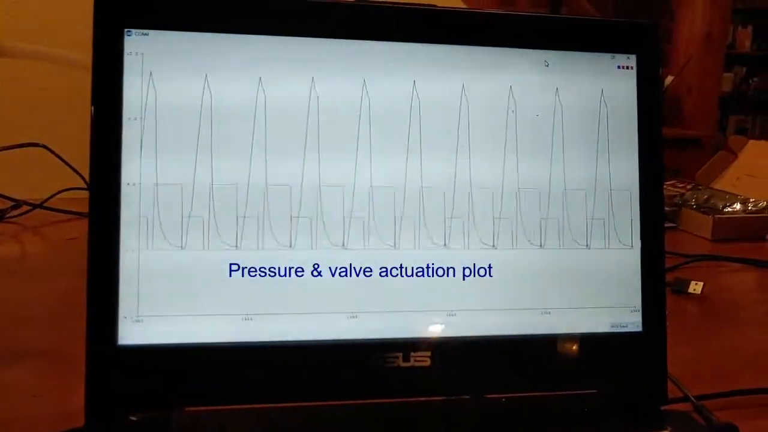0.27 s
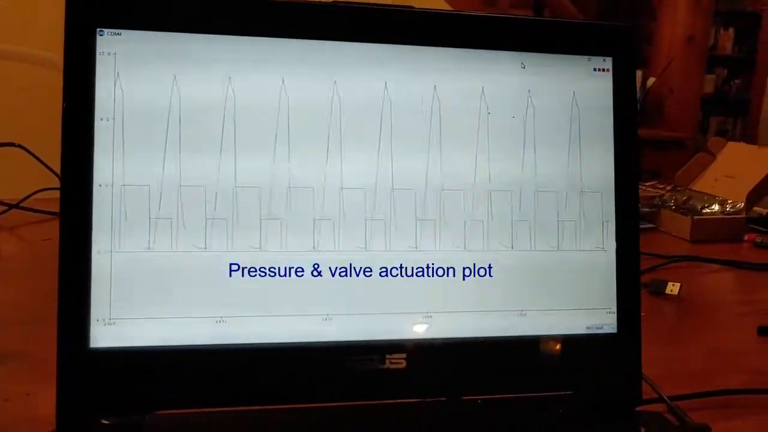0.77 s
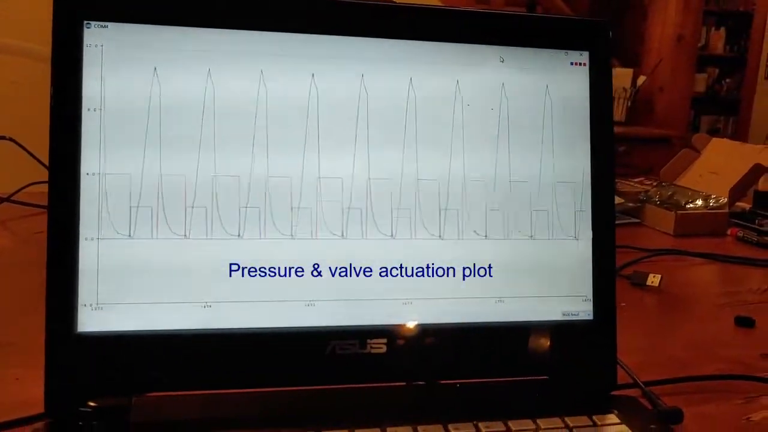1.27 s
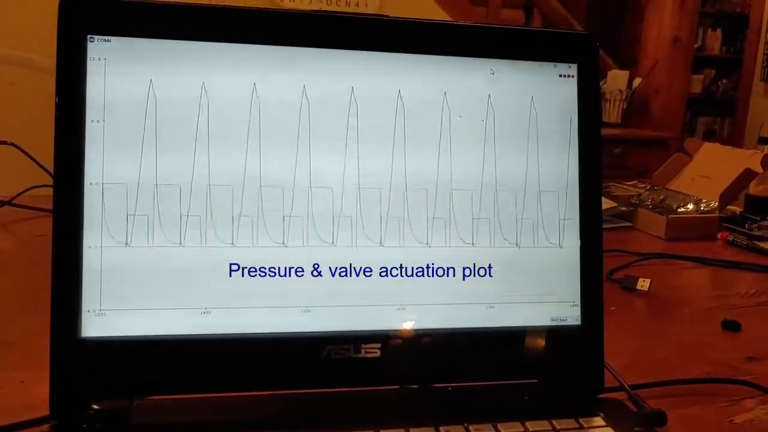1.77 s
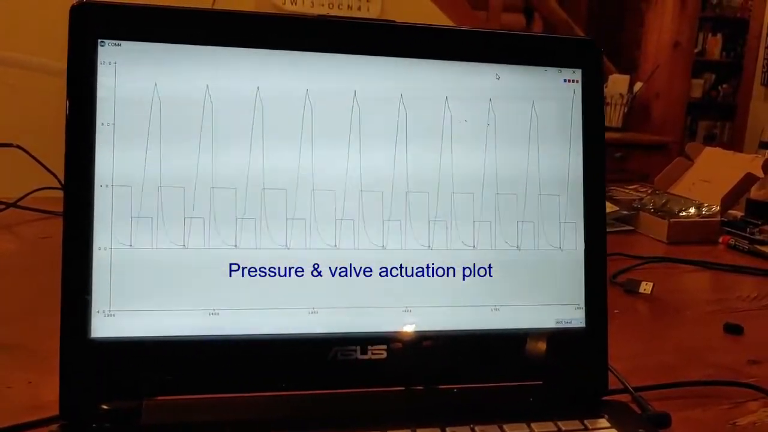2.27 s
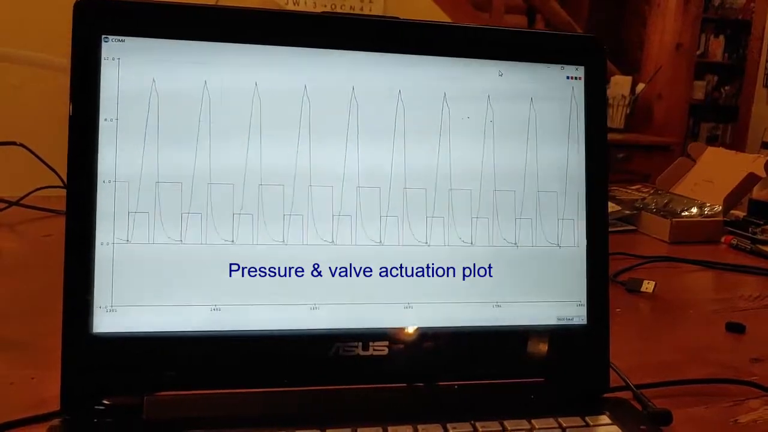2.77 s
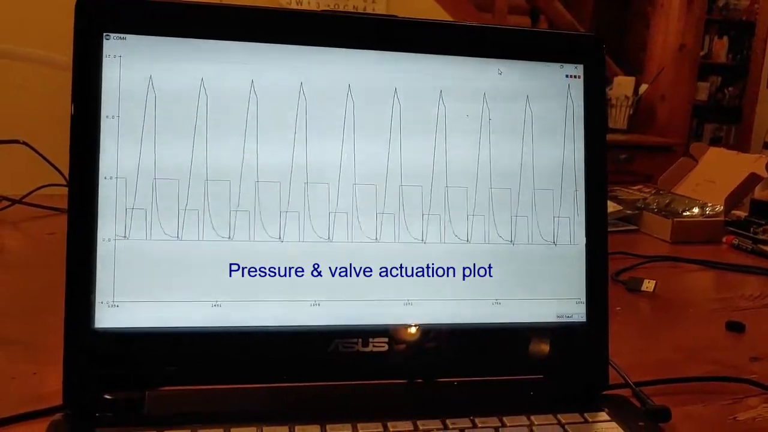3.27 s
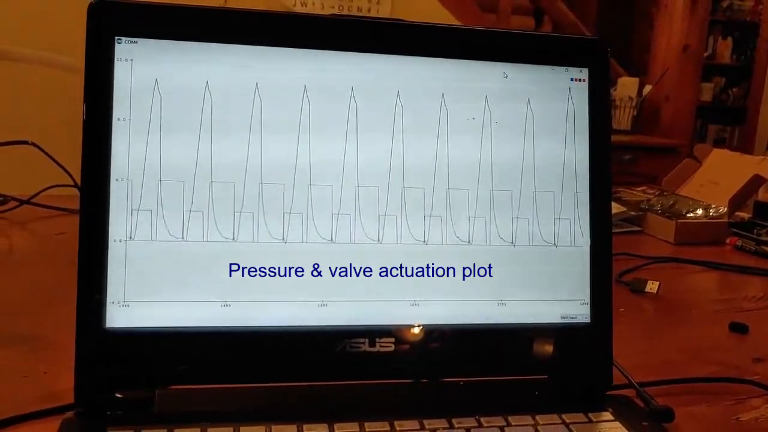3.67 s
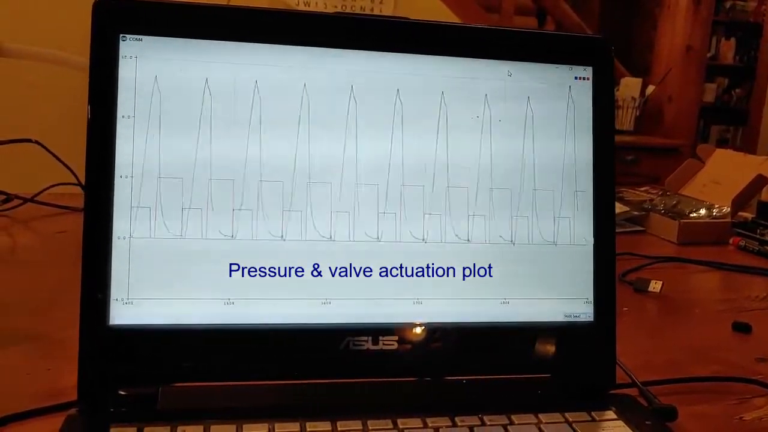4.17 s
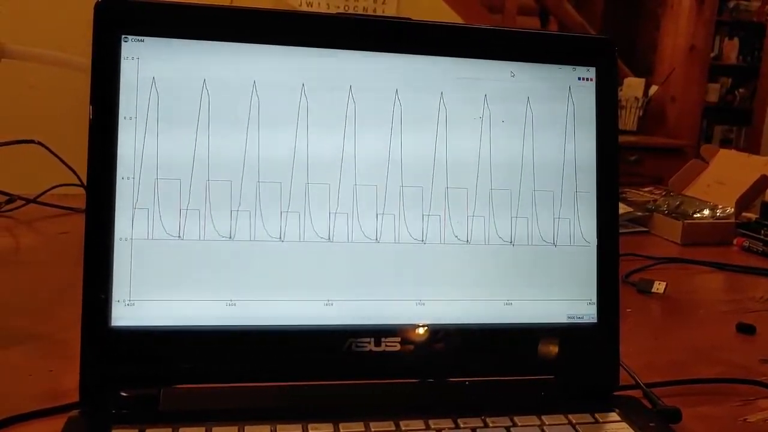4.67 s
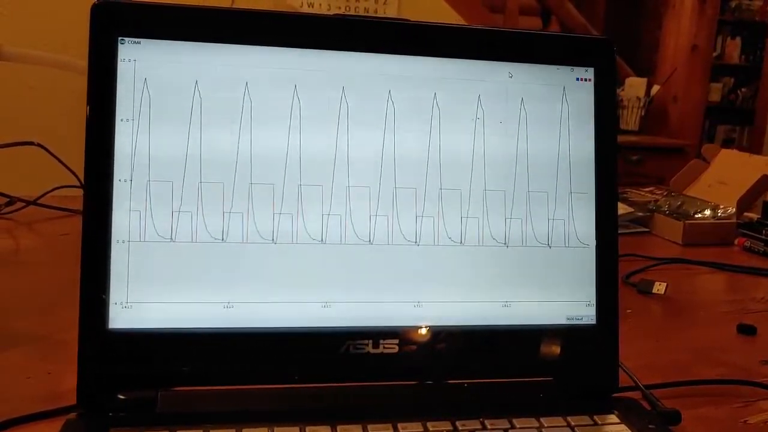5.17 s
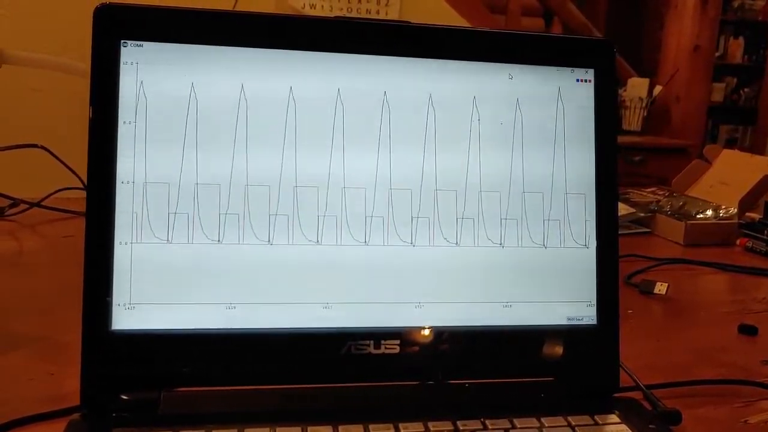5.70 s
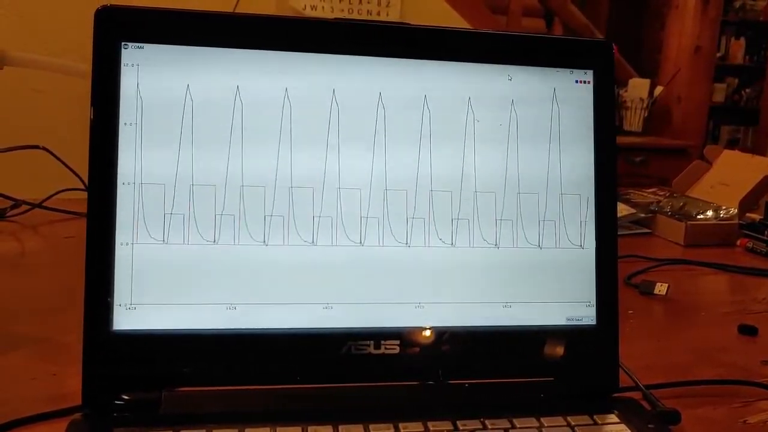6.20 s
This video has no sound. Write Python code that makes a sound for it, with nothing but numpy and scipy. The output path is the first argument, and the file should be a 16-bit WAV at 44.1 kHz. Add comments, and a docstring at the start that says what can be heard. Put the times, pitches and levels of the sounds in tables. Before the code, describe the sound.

A valve snaps with a woody table thump, compressed air hisses steadily for two seconds, then vents in a fading breathy rush; the cycle restarts.

```python
"""In a small room, a pneumatic ventilator works on a table.
A valve snaps open with a thump and a turbulent jet hisses into a box, brightening as back pressure grows.
It shuts, and the box blows down through a resonant exhaust pipe; a second valve clacks during the flow.
Weak puffs follow, then the inlet snaps open again. Each jet is noise shaped by its flow and pressure,
and the struck table is a sum of decaying modes; soft hoots and faint room noise lie beneath."""
import sys
import numpy as np
from scipy import signal
from scipy.fft import rfft, irfft, next_fast_len
from scipy.io import wavfile
from scipy.ndimage import uniform_filter1d

SR = 44100
rng = np.random.default_rng(int(sys.argv[2]) if len(sys.argv) > 2 else 0)


def int16_out(signal):
    """Quantize to a 16-bit WAV file."""
    q = np.round(np.clip(np.atleast_2d(signal).T, -1, 1) * 32767)
    wavfile.write(sys.argv[1], SR, q.astype(np.int16))


N = 284004
T = np.arange(N) / SR  # s
SIZE = next_fast_len(N + SR // 2, True) * 2  # transform length, samples
HZ = np.fft.rfftfreq(SIZE, 1 / SR)
PORT_DELAY = 0.00046  # s, the right microphone port is further away

# strokes of the inlet jet: opens t/s, shuts t/s, rise t/s, starting flow level/dB,
# starting brightness level/dB, roar level/dB, jet peak f/Hz
INLET_STROKES = [(0.148, 2.13, .005, -16, -3.5, -1, 5320), (5.27, 6.6, 0.027, -18, -0.57, 6, 4660)]
# spectrum of the inlet hiss: f/Hz, left level/dB, right level/dB
INLET_COLOUR = [(25, -29, -38), (70, -21, -23.5), (195.7, -29, -30.5), (905, -29, -28), (1430, -12, -15.5),
                (2360, -7, -4), (3262, 2, 2), (4242, -7, 12), (5126, 9, 18), (6256, 6.5, 4.5),
                (6540, 13.5, 5.5), (7427, 20.5, -11.5), (8850, 0.5, -1), (11345, -2.5, -3.5),
                (12080, -9.5, -42)]
# resonances of the box, negative ones being dips: f/Hz, width f/Hz, level/dB
BOX_RESONANCES = [(2280, 160, 4.5), (3966, 46, 7), (4280, 68, 7), (4520, 33, 5), (4787, 40, 10),
                  (4868, 130, 3.5), (4783, 50, 0), (5240, 50, -2), (5490, 17, -3), (6320, 38, 10.5),
                  (7100, 32, -7), (7520, 68, 2.5), (7860, 89, 8.5), (8600, 66, 2.5)]
# share of each control that a frequency takes: f/Hz, share of brightness, share of roar
INLET_TILT = [(200, 0, 0.38), (700, 0, 0.89), (2285, 0.42, 0.67), (3556, 0.057, 0.1), (5600, 0.16, 0),
              (6420, 0.77, 0.15)]
INLET_SAG_DB_PER_S, INLET_BRIGHTEN_DB_PER_S = 0.77, 1.5
INLET_SHUT_T60 = 0.12  # s


def inlet():
    """Orifice jet: as the box fills, its back pressure slows the turbulent air and brightens it."""
    air = np.zeros(N)
    for opens, shuts, rise, flow_db, bright_db, roar_db, peak_hz in INLET_STROKES:
        age = np.maximum(T - opens, 0)
        opening = 1 - np.exp(-age / rise)
        flow = amp(flow_db - INLET_SAG_DB_PER_S * age) * opening * fade(shuts, INLET_SHUT_T60)
        controls = [bright_db + INLET_BRIGHTEN_DB_PER_S * age, np.full(N, roar_db)]
        hiss = jet(flow, controls, INLET_TILT, flutter_db=0.84)
        air += peaked(hiss, peak_hz, width_hz=500, db=3)
    return colour(room(air, wet=1.0), INLET_COLOUR, BOX_RESONANCES)


# spectrum of the exhaust hiss: f/Hz, left level/dB, right level/dB
EXHAUST_COLOUR = [(150.0, 4, -1), (590, -7, -8), (1404, -4.5, -3.5), (2120, -5, 3), (2803, 2.2, 7),
                  (3970, -3, 6), (5080, 0, 12), (5800, 5.5, -1), (6380, 15, -7), (7030, 24.5, 4),
                  (8344, 8.5, 1.6), (8950, -13, -22), (9870, -21.5, -10.5), (11000, -36, -42.5)]
# resonances of the exhaust pipe when undamped: f/Hz, width f/Hz, level/dB
PIPE_RESONANCES = [(981, 130, 13), (1805, 310, 19.7), (2348, 130, 21.5), (3276, 540, 8.4), (4086, 53, 11),
                   (4910, 130, 6.7), (4920, 110, 3.1), (5730, 150, 5.5), (7670, 100, 3)]
# share of each control that a frequency takes: f/Hz, share of brightness,
# share of spread (a soft puff spreads its hiss more evenly)
EXHAUST_TILT = [(150, -0.66, 0), (2300, -0.042, 0), (3200, 0.57, 0.11), (4500, 0.73, .3), (5700, 0.44, .7),
                (7200, 0.52, -0.81), (8600, 1, 1), (12000, 1.56, 0)]
TRICKLE_DB = -76  # a flow this weak no longer sounds the pipe
DAMP_FROM_DB, DAMP_RANGE_DB = 11.5, 9  # brightness where damping starts; further rise to full damping
DAMP_WIDEN, DAMP_HEIGHT = 1.9, 0.62  # factors on the width and dB height of a damped resonance


def exhaust(leak_db=-81):
    """Flow-dependent damping: a bright, fast jet blunts the pipe's resonances; a faint leak bypasses them."""
    flow_db, bright_db, spread_db = outflow()
    flow = amp(flow_db) - amp(TRICKLE_DB)
    air = room(jet(flow, [bright_db, spread_db], EXHAUST_TILT, flutter_db=0.15), wet=0.85)
    damping = np.clip((bright_db - DAMP_FROM_DB) / DAMP_RANGE_DB, 0, 1)
    damped_pipe = [(hz, DAMP_WIDEN * width, DAMP_HEIGHT * db) for hz, width, db in PIPE_RESONANCES]
    free_air = colour((1 - damping) * air, EXHAUST_COLOUR, PIPE_RESONANCES)
    damped_air = colour(damping * air, EXHAUST_COLOUR, damped_pipe)
    leak = colour(room(amp(leak_db) * rng.standard_normal(N), wet=0.7), EXHAUST_COLOUR)
    return free_air + damped_air + leak


# puffs through the exhaust: start t/s, level/dB, rise t/s, hold t/s, t60 t/s,
# extra brightness level/dB, spread level/dB
EXHAUST_PUFFS = [(0, -43.5, 0.0014, .004, 0.037, -4, 7.5), (3.048, -42.5, 0.12, 0.13, 0.52, 1.5, -1),
                 (3.526, -65.5, 0.046, 0.035, 1, -2.5, 1), (3.782, -54, 0.044, .004, 0.14, -4, 7),
                 (4.288, -51, 0.035, 0.056, 0.55, -0.5, 7.5), (5.062, -48.5, 0.059, .004, 0.11, 2, 8)]
# the exhaust opens, holds its flow, then runs down
VENT_S, VENT_DB, VENT_RISE_S, VENT_HOLD_S, VENT_T60 = 2.14, -32.5, 0.003, 0.41, 3.34
EMPTY_S, EMPTY_T60 = 3.27, 0.87  # s, the box is nearly empty and the long push gives out
# it starts bright under pressure, then dulls as that runs down
VENT_BRIGHT_DB, VENT_DULL_DB_PER_S = 18.5, 28
# dB of brightness per dB of flow above a middling flow, and the lower limit of that brightness
BRIGHT_PER_FLOW, MIDDLING_DB, DULLEST_DB = 0.45, -47.5, -10


def outflow():
    """Blowdown: exhaust flow, brightness and spread in dB, all set by falling pressure and the puffs."""
    age = np.maximum(T - VENT_S, 0)
    flow = amp(VENT_DB) * (1 - np.exp(-age / VENT_RISE_S))
    flow = flow * fade(VENT_S + VENT_HOLD_S, VENT_T60) * fade(EMPTY_S, EMPTY_T60)
    power = flow ** 2 + amp(TRICKLE_DB) ** 2
    extra, spread = 0, 0  # weighted by the power of each puff
    for s, db, rise, hold, t60, extra_db, spread_db in EXHAUST_PUFFS:
        swell = np.sin(np.pi / 2 * np.clip((T - s) / rise, 0, 1)) ** 2
        puff_power = (amp(db) * swell * fade(s + rise + hold, t60)) ** 2
        power = power + puff_power
        extra = extra + extra_db * puff_power
        spread = spread + spread_db * puff_power
    flow_db = 10 * np.log10(power)
    pressure_db = np.maximum(VENT_BRIGHT_DB - VENT_DULL_DB_PER_S * age, 0) * (age > 0)
    speed_db = np.maximum(BRIGHT_PER_FLOW * (flow_db - MIDDLING_DB), DULLEST_DB)
    return flow_db, pressure_db + speed_db + extra / power, spread / power


# narrow tones that the exhaust pipe sings: f/Hz, pole width f/Hz, relative level/dB
SUNG_TONES = [(1005, 70, -17.5), (1744, 65, -1.5), (2369, 55, -4.5), (3117, 66, -3), (3220, 67, -11)]


def pipe_tones(level_db=1, left_db=-8, follow=0.54, swamp_above_db=12, swamp_db=0.5, likeness=0.41,
               lag_s=0.015, waver_db=2):
    """Flow-excited resonance: the pipe's tones lag the flow, waver, and drown when the jet is bright."""
    flow_db, bright_db, _ = outflow()
    swamping_db = swamp_db * np.maximum(bright_db - swamp_above_db, 0)
    tone_db = MIDDLING_DB + follow * (flow_db - MIDDLING_DB) - swamping_db
    blown = 1 - amp(TRICKLE_DB - flow_db)  # a mere trickle does not sound the pipe
    singing = np.interp(T - lag_s, T, blown ** 2 * amp(tone_db))
    tone, other = np.zeros((2, N))
    for hz, width, db in SUNG_TONES:
        waver = evened(uniform_filter1d(rng.standard_normal(N), size=2500))
        drive = amp(level_db + db + waver_db * waver) * singing * rng.standard_normal((2, N))
        tone = tone + resonate(drive[0], hz, width)
        other = other + resonate(drive[1], hz, width)
    left = amp(left_db) * (likeness * tone + np.sqrt(1 - likeness ** 2) * other)
    return np.array([left, np.roll(tone, round(PORT_DELAY * SR))])


# valve spools hitting their stops: t/s, relative level/dB, t60 t/s, first bounce after t/s,
# bounce level re hit/dB, extra treble level/dB
STOP_HITS = [(0.1243, -5, 0.02, 0.01, -4.5, -15), (2.6387, -1.5, 0.015, 0.007, -8, 20),
             (5.25, -3, 0.017, 0.013, -4, -11)]
# spectrum of the clicks: f/Hz, left level/dB, right level/dB
HIT_COLOUR = [(400.0, -4.5, -15.5), (1320, -13.5, -2.5), (2930, 3.5, 10), (4540, -0.5, 7.5), (6130, -18, 3),
              (7740, 19.5, -11), (9850, 0, 11), (12600, -16, -9.5), (15000.0, -30.5, -37)]
BOUNCE_SHRINK, BOUNCE_LOSS_DB, BOUNCE_T60 = 0.78, -0.5, 0.009  # each bounce comes sooner and weaker


def valve_clicks(click_db=-3, rise=0.00021, count=3):
    """Impact and restitution: each spool hits its stop and bounces at shrinking intervals."""
    clicks = np.zeros(N)
    for s, db, t60, gap, bounce_db, treble_db in STOP_HITS:
        hit_db = db + click_db
        add(clicks, s, amp(hit_db) * burst(rise, t60, treble_db))
        delays = np.cumsum(gap * BOUNCE_SHRINK ** np.arange(count))
        for k, delay in enumerate(delays):
            level = amp(hit_db + bounce_db + k * BOUNCE_LOSS_DB)
            add(clicks, s + delay, level * burst(rise, BOUNCE_T60))
    return colour(room(clicks, wet=0.36), HIT_COLOUR)


# air escaping while a spool travels: t/s, level/dB, rise t/s, t60 t/s, extra treble level/dB
AIR_SPURTS = [(0.1146, -12, 0.002, 0.022, 0), (0.127, -22, 0.0019, 0.18, -1),
              (2.1429, -7, 0.0013, 0.015, -2), (2.6282, -10, .002, 0.06, 15),
              (2.649, -16.5, 0.0119, 0.49, -1.5), (5.2414, -15, 0.0008, 0.026, -4),
              (5.254, -24, 0.0027, 0.4, -6)]
# spectrum of the spurts: f/Hz, left level/dB, right level/dB
AIR_SPURT_COLOUR = [(200.0, -1.5, -7), (700.0, -12.5, -7.5), (1378, -12.5, 0), (2304, 3, -3),
                    (4000.0, -17, -13.5), (5100, -2, 7), (6600, 17, -1), (7800, 22, -2.5), (9100, 5, 4),
                    (10120, 0, 9.5), (11900, -9, -12.5), (15000.0, -22.5, -52.5)]


def valve_spurts():
    """Transient turbulence: a travelling spool lets out a short spurt of air."""
    spurts = np.zeros(N)
    for s, db, rise, t60, treble_db in AIR_SPURTS:
        add(spurts, s, amp(db) * burst(rise, t60, treble_db))
    return colour(room(spurts, wet=0.77), AIR_SPURT_COLOUR)


# knocks of the valves on the table: t/s, ring level/dB, dull thud level/dB
TABLE_KNOCKS = [(0.128, -16.5, -18), (2.133, -43, -32), (2.424, -54.5, -47.5), (2.632, -29, -42.5),
                (5.2552, -17, -17.5)]
# modes of the table and box: f/Hz, relative level/dB, t60 t/s
TABLE_MODES = [(91.5, -19, 0.51), (127, -3.5, 0.48), (142.5, -14, 0.26), (171.9, -21.5, 0.35),
               (249.7, -14, 0.23), (286, -14.5, 0.45), (383.7, -11.5, 0.12), (452.4, -6, 0.099),
               (468, -13, 0.13), (615, -16.5, 0.17), (715, -14, 0.16), (916, -16.5, 0.2),
               (1013, -15.5, 0.17)]
# spectrum of the thuds: f/Hz, left level/dB, right level/dB
KNOCK_COLOUR = [(20, -32.5, -29.5), (60.65, -7, -4.5), (130.1, 5.5, 14), (247.4, 16, 12), (480, 10, 14.5),
                (793, 7.5, 7.5), (1500, -3, -4), (3988, -42, -38.5)]


def table(rise=0.0025, thud_t60=0.062, right_db=-1.5, stop_s=0.17):
    """Modal vibration: the recoil of a valve gives a dull thud and rings the table and box."""
    t = T[:SR]
    ring = np.zeros(SR)
    for hz, db, t60 in TABLE_MODES:
        ring += amp(db) * np.exp(-np.log(1000) * t / t60) * np.sin(2 * np.pi * hz * t)
    ring = ring / (1 + (t / stop_s) ** 10)  # friction stops the last small swings
    rings, thuds = np.zeros((2, N))
    for s, ring_db, thud_db in TABLE_KNOCKS:
        add(rings, s, amp(ring_db) * ring * (1 - np.exp(-t / rise)))
        add(thuds, s, amp(thud_db) * burst(rise, thud_t60))
    return np.array([rings, amp(right_db) * rings]) + colour(room(thuds, wet=3.0), KNOCK_COLOUR)


BLEED_STOP_S, BLEED_DB, BLEED_SAG_DB_PER_S = 2.64, -19, 11
BLEED_HZ, BLEED_WIDTH_HZ = 4870, 1000  # centre and pole width of each of two resonances in series


def bleed(left_db=-8):
    """Band-limited leakage: the shut inlet bleeds a sagging hiss until the second valve closes."""
    age = T - INLET_STROKES[0][1]
    flow = amp(BLEED_DB - BLEED_SAG_DB_PER_S * np.maximum(age, 0)) * (age > 0)
    flow = flow * fade(BLEED_STOP_S, INLET_SHUT_T60)
    hiss = resonate(rng.standard_normal(N), BLEED_HZ, BLEED_WIDTH_HZ)
    hiss = resonate(hiss, BLEED_HZ, BLEED_WIDTH_HZ)
    return np.array([[amp(left_db)], [1]]) * room(flow * evened(hiss), wet=0.8)


# low hoots and gulps of air in the box, plus the low sound of a knock at 2.135 s and the low rumble after # a
# thump at 2.73 s: middle t/s, f/Hz, pole width f/Hz, level/dB, length t/s
BOX_HOOTS = [(0.354, 387, 109, -38.5, 0.069), (0.367, 350, 288, -49.5, 0.33),
             (0.599, 303, 404, -54.5, 0.42), (2.135, 520, 550, -37, 0.027), (2.181, 404, 495, -54, 0.097),
             (2.73, 220, 299, -51, 0.28), (5.503, 378, 80, -43.5, 0.13), (5.56, 414, 400, -54, 0.62),
             (5.618, 280, 60, -48, 0.085), (5.717, 271, 60, -49.5, 0.16)]


def hoots():
    """Resonance: filtered noise makes soft, fuzzy low tones, the same on both sides: hoots in the box, a low
    knock and a thump's rumble."""
    out = np.zeros(N)
    for s, hz, width_hz, db, length in BOX_HOOTS:
        tone = resonate(rng.standard_normal(SR), hz, width_hz)[-round(length * SR):]
        add(out, s - length / 2, amp(db) * evened(tone) * np.hanning(len(tone)))
    return out


# spectrum of the quiet room noise: f/Hz, relative level/dB
FLOOR_COLOUR = [(20, -26.5), (40, -21), (64, 4), (100, -11), (130, -7.5), (180, -16.5), (320, -17.5),
                (550, -23.5), (1000, -20), (1600, -29.5), (5000, -31), (9000, -39), (15500, -45)]
# coherence of the room noise: f/Hz, left-right likeness
FLOOR_LIKENESS = [(100, 1), (400, 0.82), (1200, .1)]


def floor(level_db=-62.5):
    """Interaural coherence: steady room noise is alike on both sides in the bass."""
    left, other = rfft(rng.standard_normal((2, SIZE)))
    same = np.clip(read(FLOOR_LIKENESS, HZ), 0, 1)
    right = same * left + np.sqrt(1 - same ** 2) * other
    spectrum = np.array([left, right]) * amp(read(FLOOR_COLOUR, HZ))
    return amp(level_db) * evened(irfft(spectrum, SIZE)[:, :N])


# reverberation time of the room: f/Hz, t60 t/s
REVERB_T60 = [(200, 0.55), (2000, .3), (7000, 0.2), (15000, 0.34)]
# reflected power at wet = 1: f/Hz, share of the power
REFLECTED_SHARE = [(150, 0.33), (600, 0.62), (2000, 1), (5000, 0.28), (12000, 0.59)]


def room(x, wet, size=256):
    """Reverberation: direct sound meets the left port first; reflections die band by band."""
    count = SR // 2
    direct = np.zeros((2, count))
    direct[0, 0] = direct[1, round(PORT_DELAY * SR)] = 1
    hz, t, z = signal.stft(rng.standard_normal((2, count)), SR, nperseg=size)
    z = z * amp(-60 * t / read(REVERB_T60, hz)[:, None]) * (t > 0.004)
    z /= np.linalg.norm(z, axis=2, keepdims=True)  # equal energy in every band
    tail = evened(signal.istft(z, SR, nperseg=size)[1][:, :count]) / np.sqrt(count)
    share = np.clip(wet * read(REFLECTED_SHARE, HZ), 0, 1)
    response = np.sqrt(1 - share) * rfft(direct, SIZE) + np.sqrt(share) * rfft(tail, SIZE)
    return irfft(rfft(x, SIZE) * response, SIZE)[:, :N]


def jet(flow, controls, tilt, flutter_db, patchy_db=1.0, size=256):
    """Turbulence: noise follows the flow, changes colour with its controls and flutters a little."""
    hz, t, z = signal.stft(rng.standard_normal(N), SR, nperseg=size)
    for k, control_db in enumerate(controls):
        share = read(tilt, hz, axis=k + 1)[:, None]
        z = z * amp(share * np.interp(t, T, control_db))
    # the jet wanders, so its colour drifts in patches
    patches = uniform_filter1d(rng.standard_normal(z.shape), size=4, axis=0)
    patches = uniform_filter1d(patches, size=45, axis=1)
    z = z * amp(patchy_db * evened(patches))
    flutter = evened(uniform_filter1d(rng.standard_normal(N), size=500))
    return flow * amp(flutter_db * flutter) * signal.istft(z, SR, nperseg=size)[1][:N]


def burst(rise, t60, treble_db=0):
    """Exponential decay: noise swells quickly and dies away, with its treble above 11 kHz adjusted."""
    t, hz = T[:SR], np.fft.rfftfreq(SR, 1 / SR)
    treble_share = 1 - 1 / (1 + (hz / 11000) ** 10)
    noise = irfft(rfft(rng.standard_normal(SR)) * amp(treble_db * treble_share), SR)
    return noise * (1 - np.exp(-t / rise)) * np.exp(-np.log(1000) * t / t60)


def colour(x, spectrum, resonances=(), size=4096):
    """Minimum-phase filtering: a causal filter for each side, resonances on a broad spectrum."""
    hz = abs(np.fft.fftfreq(size, 1 / SR))
    db = np.array([read(spectrum, hz, axis=1), read(spectrum, hz, axis=2)])
    for f, width, height in resonances:
        db = db + height / (1 + (2 * (hz - f) / width) ** 2)
    log_response = np.conj(signal.hilbert(np.log(amp(db))))
    taps = np.fft.ifft(np.exp(log_response)).real
    return signal.oaconvolve(np.atleast_2d(x), taps[:, :size // 2], axes=1)[:, :N]


def resonate(x, hz, width_hz):
    """Double-pole resonance: a steep band that keeps the power of white noise."""
    n = np.arange(SR // 4)
    pole = np.exp((2j * hz - width_hz) * np.pi / SR)
    ring = (n * pole ** n).real
    return signal.oaconvolve(x, ring / np.linalg.norm(ring))[:len(x)]


def peaked(x, hz, width_hz, db):
    """Spectral peaking: lifts one band of a noise."""
    gain = amp(db / (1 + (2 * (HZ - hz) / width_hz) ** 2))
    return irfft(rfft(x, SIZE) * gain, SIZE)[:N]


def fade(s, t60):
    """Exponential decay: full until time s, then falling 60 dB in each t60."""
    return amp(-60 * np.maximum(T - s, 0) / t60)


def amp(db):
    """Logarithmic level: decibels to gain."""
    return 10 ** (np.asarray(db) / 20)


def evened(x):
    """Power normalisation: scales to rms 1."""
    return x / np.sqrt(np.mean(x ** 2))


def read(columns, hz, axis=1):
    """Logarithmic frequency scale: interpolates one column of a table along it."""
    columns = np.array(columns, float)
    return np.interp(np.log(hz + 1), np.log(columns[:, 0] + 1), columns[:, axis])


def add(mix, s, sound):
    """Superposition: adds a sound to the mix at time s."""
    part = mix[round(s * SR):][:len(sound)]
    part += sound[:len(part)]


def scene():
    """Superposition: the whole machine in its room."""
    air = inlet() + exhaust() + pipe_tones() + bleed()
    knocks = valve_clicks() + valve_spurts() + table()
    return air + knocks + hoots() + floor()


def record(dry, knee=8):
    """Saturation and band limiting: overload rounds the loudest peaks, then the top is cut."""
    low_pass = signal.firwin(511, 15900, window=("kaiser", 9), fs=SR)  # edge in Hz
    limited = dry / (1 + abs(dry) ** knee) ** (1 / knee)
    return signal.oaconvolve(limited, low_pass[None], "same", axes=1)


dry = scene()
out = record(dry)
int16_out(out)
```